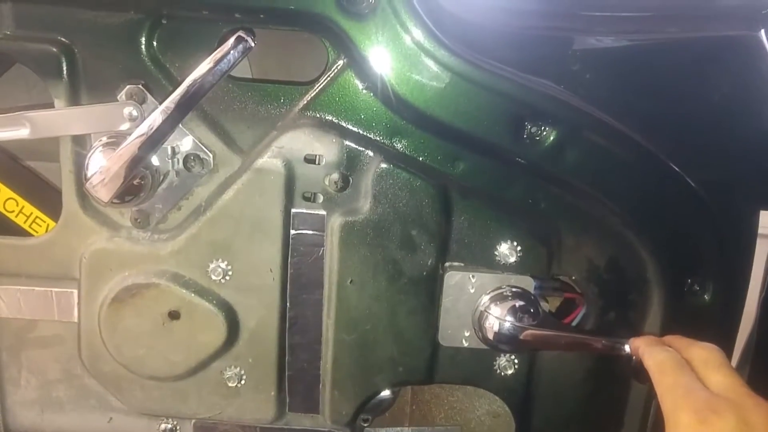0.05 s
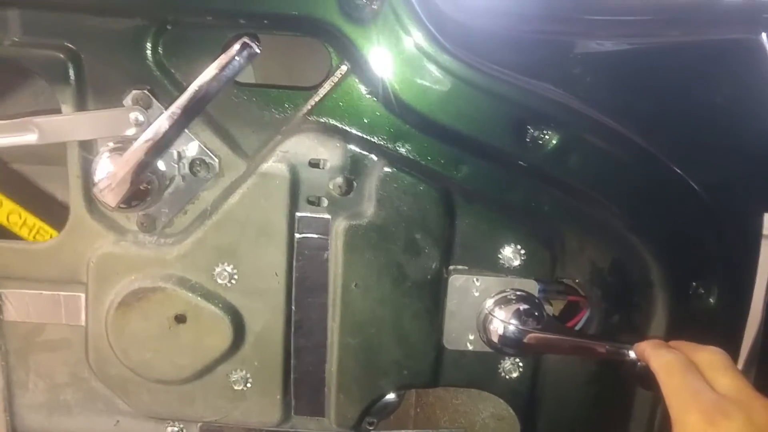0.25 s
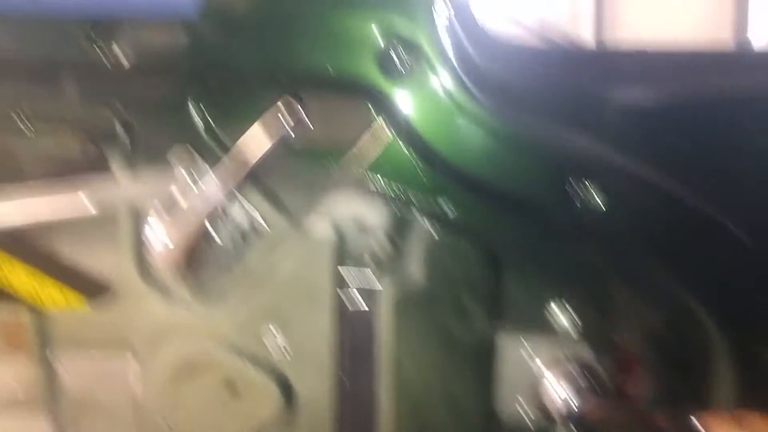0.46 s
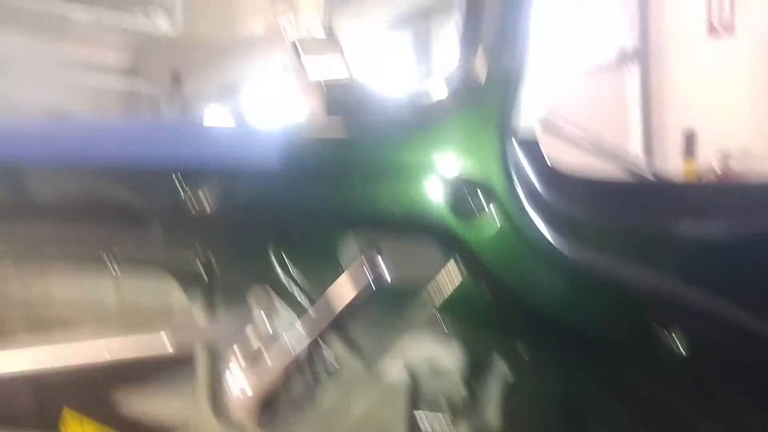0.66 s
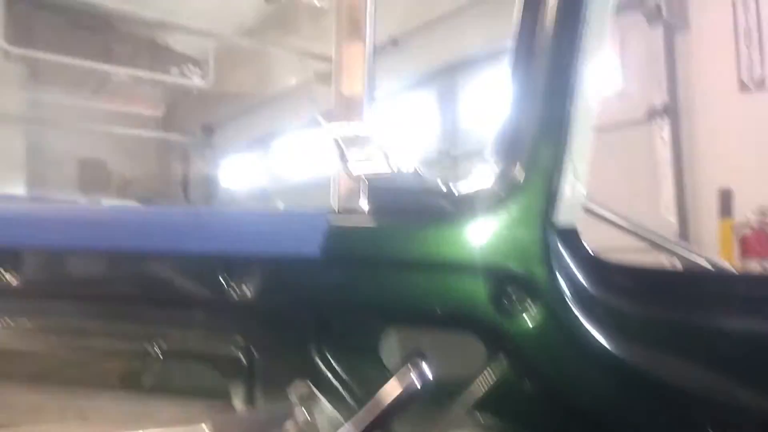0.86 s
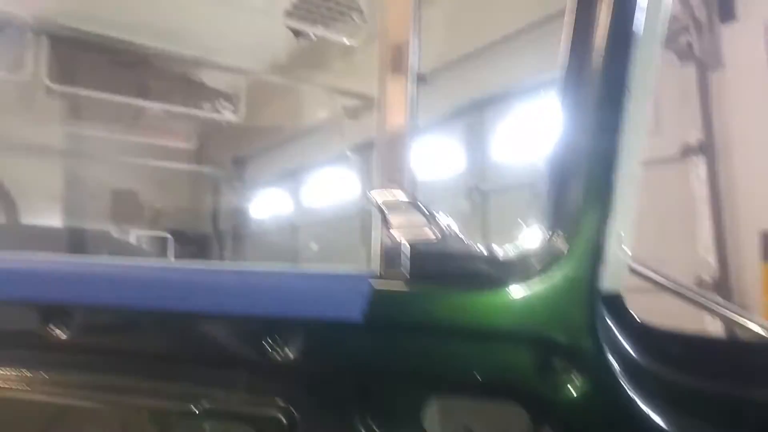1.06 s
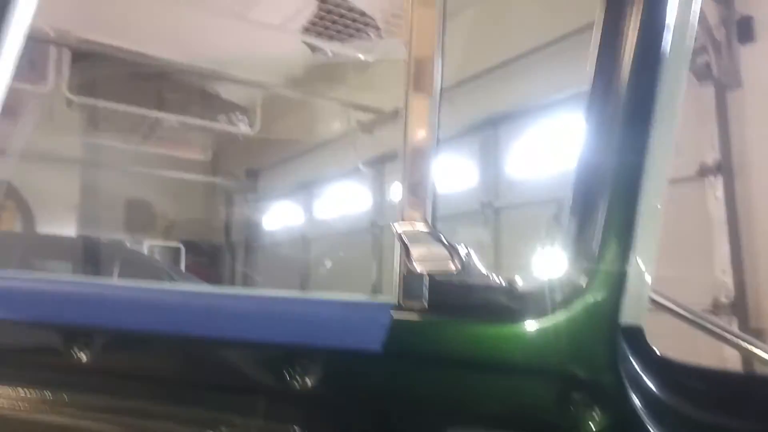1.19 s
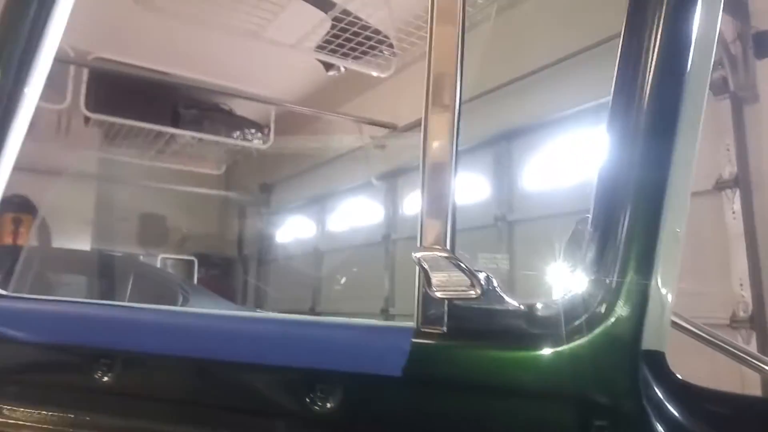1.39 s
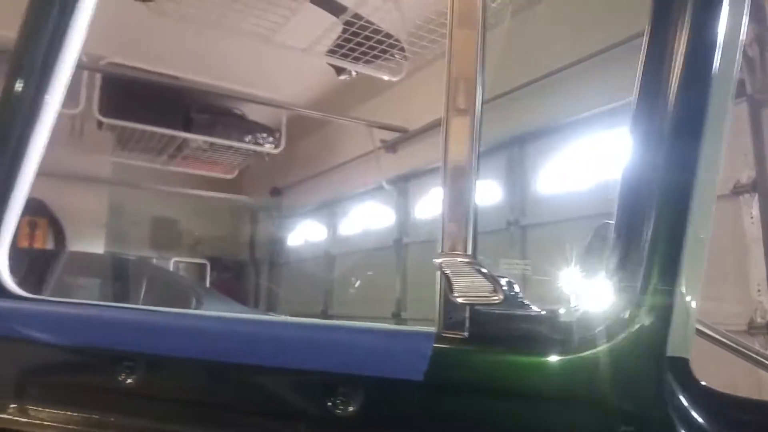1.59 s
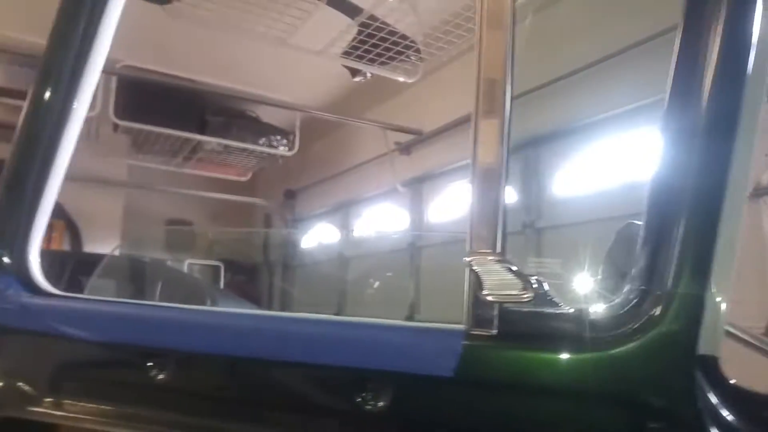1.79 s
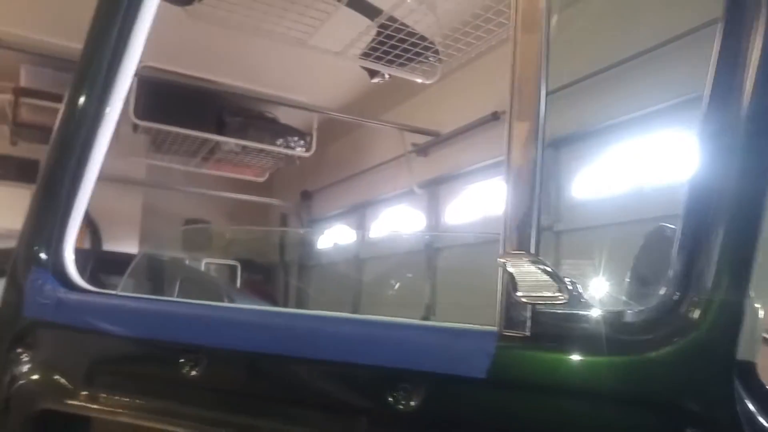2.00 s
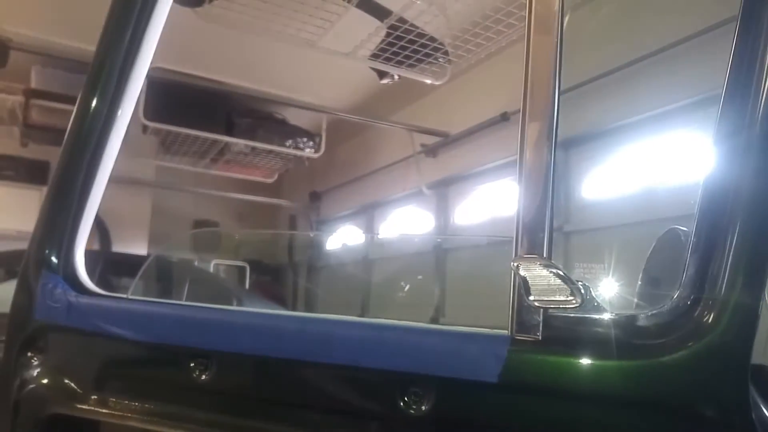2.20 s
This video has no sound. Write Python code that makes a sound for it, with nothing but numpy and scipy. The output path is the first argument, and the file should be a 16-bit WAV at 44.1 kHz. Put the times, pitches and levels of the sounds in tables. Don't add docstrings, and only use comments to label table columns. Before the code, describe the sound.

A power window motor runs inside a hollow steel vehicle door. Faint garage murmur comes first; a switch ticks near 0.2 s, then loud knocks, rattles and gritty scrapes crowd in until 0.8 s. A steady low hum with gear whine and bright brush hiss continues, with softer knocks around 1.4-1.55 s. At 1.8 s it clicks and clunks off, with tiny spring chatter and low panel ringing fading into murmur.

```python
import sys
import numpy as np
from scipy import signal
from scipy.fft import rfft, irfft
from scipy.io import wavfile
from scipy.ndimage import uniform_filter1d

SR = 44100
rng = np.random.default_rng(int(sys.argv[2]) if len(sys.argv) > 2 else 0)


def voltage_ratio(decibels):
    exponent = np.asarray(decibels, float) / 20
    return 10 ** exponent


def dump_mix(stems):
    frames = np.atleast_2d(stems).T
    limited = np.clip(frames, -1, 1)
    pcm = np.round(limited * 32767).astype(np.int16)
    wavfile.write(sys.argv[1], SR, pcm)


N = 99225
T = np.arange(N) / SR

# [t/s, turns per s]
SHAFT_SPEED = [(0.209, 96), (0.299, 110), (.41, 108.6), (.46, 107), (.59, 107), (.66, 108.3), (1.25, 108.4),
               (1.42, 109.6), (1.84, 109.7)]
WHINE_MULTIPLES = [2, 6, 8.9, 22, 25, 26, 28, 30, 34, 38, 40, 70, 80]
WHINE_LEVELS = [(-40, -54, -44, -53), (-44, -51, -41, -52.5), (-52, -45, -47.5, -54),
                (-48, -57, -49, -57.5), (-55, -65, -47, -60), (-47.5, -52, -59, -59),
                (-70, -69, -64, -52.5), (-65, -54, -50, -55.5), (-64, -66, -60, -58),
                (-70, -55.5, -53, -68), (-52, -48.5, -61.5, -50), (-47.5, -54, -50, -52),
                (-64, -65, -52, -54)]
POSE_TIMES = [.52, .7, 1.15, 1.45]
# [t/s, level/dB]
COMMUTATOR = [(.3, -50), (.44, -37), (.63, -36.5), (.7, -48.5), (1.18, -45.5), (1.44, -33.5), (1.6, -36),
              (1.83, -34)]
START_S, SPIN_UP_S, STOP_S, COAST_S = 0.23, 0.25, 1.83, 0.04
WHINE_WAVER_DB = 1.4

# [t/s, level/dB]
BOOM = [(.195, -33.5), (.222, -12.5), (.288, -21), (.312, -15.5), (.375, -25), (.432, -17.5), (.46, -25.5),
        (.544, -17.5), (.606, -26), (.7, -22), (.725, -15.5), (.78, -19.5), (1.5, -23), (1.586, -23),
        (1.62, -23.5), (1.83, -26)]
# [multiple of its pitch, level/dB]
BOOM_PARTS = [
    (1, -1),
    (2, -19.5),
]
BOOM_HZ, BOOM_WANDER_HZ = 120.06, 1.255

# [t/s, peak level/dB, brightness/dB, length/s]
KNOCKS = [(0.208, -22.5, -10.5, 0.025), (0.229, -14, -35, 0.015), (0.293, -4, -12, 0.029),
          (0.405, -15.5, -6, 0.024), (0.415, -5, -33, 0.018), (0.436, -15, -20, 0.011),
          (0.497, -9, -31, 0.013), (0.512, -10, -35, 0.01), (0.538, -20, -24, 0.012),
          (0.574, -9.5, -34, 0.0074), (0.586, -16, -26, 0.026), (0.601, -12, -31, 0.02),
          (0.626, -18, -24, 0.013), (0.649, -14, -26, 0.015), (0.689, -18, -34, 0.03),
          (0.759, -29, -30, 0.015), (0.8, -20, -26, 0.015), (1.41, -17.5, -30, 0.033),
          (1.484, -19.5, -27, 0.024), (1.546, -14, -25.5, 0.023), (1.829, -9.5, -25.5, 0.022)]
# [f/Hz, level/dB]
DOOR_MODES = [(125, -2.5), (180, -12), (230, -7.5), (345, -2), (378, -4), (610, -0.5), (707, 1),
              (810, -3.5), (955, -22), (1100, -6), (1370, -8), (1700, -8.5), (2050, -17), (2450, -17)]
# [f/Hz, level/dB]
CRACK_COLOUR = [(350, -32), (600, -0.5), (1260, -7.5), (2310, -17), (4010, -26), (8290, -20.5),
                (15000, -43)]
CONTACTS_PER_S, KNOCK_DB, CRACK_DB, CRACK_T60_S = 2500, -13.5, 11, 0.081
DOOR_T60_S, DOOR_DAMPING = 0.14, 0.6

# [t/s, level/dB, f/Hz, t60/s]
REBOUND = [(.294, -10.5, 1030, 0.046), (.299, -13, 830, 0.2), (.309, -14, 740, 0.13), (.418, -17, 373, .15),
           (.654, -14.5, 740, 0.055), (1.845, -22, 580, 0.21), (0.43, -13, 231, 0.25),
           (.594, -13, 624, 0.22), (1.833, -12, 593, 0.084), (1.834, -11.5, 827, 0.041),
           (.44, -17, 610, 0.098), (0.52, -19.5, 794, .05), (1.842, -15, 124, 0.34), (1.855, -28, 65, 0.88),
           (1.881, -25.5, 47, 1.6), (1.864, -21.5, 360, 0.21), (1.859, -21, 211.3, 0.25),
           (1.912, -27.5, 271, 0.4), (1.947, -26.5, 136.4, 0.19)]

# [t/s, level/dB]
SHAKE = [(.19, -41), (.23, -32), (.38, -26), (.45, -25.5), (.7, -27.5), (.85, -35), (1.38, -36),
         (1.45, -31), (1.62, -36), (1.81, -34.5), (1.87, -36), (2.1, -45.5), (2.25, -48)]
# [f/Hz, level/dB per Hz]
SHAKE_COLOUR = [(82, -53), (140, -9), (172, -8), (346, -15), (491, -9.5), (655, -13.5), (1100, -23),
                (1510, -32), (2500, -47), (3250, -79), (5500, -120)]
RATTLES_PER_S, RATTLE_DB, RATTLE_SPREAD_DB, RATTLE_CLUMP_DB = 900, -3, 2.5, 1.5

# [t/s, peak level/dB, f/Hz, t60/s]
SCRAPES = [(0.209, -31.5, 2230, 0.13), (.212, -37, 1760, 0.11), (.293, -29, 8300, 0.064),
           (.293, -32, 5500, .06), (.293, -23, 1490, 0.089), (.293, -22.5, 2460, .1),
           (.296, -31, 3150, .06), (.32, -32.5, 2320, 0.087), (.404, -29.5, 7200, 0.12),
           (0.404, -31.5, 4560, 0.088), (.404, -30, 2500, .06), (.408, -38, 10500, 0.051),
           (1.825, -30, 2300, .06), (1.827, -30, 1280, .06), (1.829, -35, 3600, .1), (.49, -35, 2280, .08),
           (.516, -34, 2150, .07), (.591, -32, 1920, 0.088), (0.616, -33.5, 2320, 0.099),
           (.653, -33.5, 2360, .05), (.682, -33.5, 2240, .08), (1.47, -40, 8300, 1), (1.62, -46, 8160, .8)]
SCRAPE_WIDTH = 0.17

# [t/s, peak level/dB, f/Hz]
TICKS = [
    (0.1836, -19, 8500),
    (1.81, -24.5, 8360),
    (1.8265, -26.5, 5570),
]
# [t/s, peak level/dB]
CHATTER = [
    (1.8537, -31),
    (1.874, -33),
    (1.8971, -34),
    (1.917, -33),
    (1.9304, -35.5),
]
TICK_T60_S, TICK_WIDTH, TICK_DB = 0.053, 0.087, -6.5
CHATTER_HZ, SNAP_DB, SNAP_T60_S = 12600, -6.5, 0.032

# [t/s, level/dB]
HISS = [(.18, -49), (.3, -35.5), (.5, -35.5), (1.3, -39), (1.55, -37.5), (1.82, -39), (1.87, -45),
        (2.0, -52)]
# [f/Hz, level/dB per Hz]
HISS_COLOUR = [(1060, -4), (1800, 0.5), (3170, -3.5), (3540, -5.5), (5800, -2.5), (8440, 2), (10500, -7.5),
               (13600, -7.5), (16000, -6.5)]

# [t/s, level/dB]
SHUDDER = [(0, -54), (.18, -57), (.25, -44), (.7, -28.5), (1.0, -42), (1.25, -43), (1.6, -35), (1.8, -42.5),
           (2.0, -30.5), (2.25, -50)]
SHUDDER_HZ, SHUDDER_WIDTH_HZ = 58, 18.4

# [t/s, murmur level/dB, microphone hiss level/dB]
BACKGROUND = [(0, -43, -52), (.2, -43.5, -50.5), (2.0, -40, -47.5), (2.25, -42, -47.5)]
# [f/Hz, level/dB]
MURMUR_COLOUR = [(53, -56), (90, -25), (242, -8), (292, -28), (365, -2), (411, -16.5), (758, -12),
                 (1500, -28.5), (1950, -58), (3300, -120)]
# [f/Hz, level/dB]
MIC_HISS_COLOUR = [(880, -40), (1500, -8.5), (1810, -5), (5280, -19), (7170, -4), (8400, -12), (16000, -30)]
FAN_HZ, FAN_DB = 849, -47

# [f/Hz, likeness from 0 to 1]
LIKENESS = [(200, 1), (950, 0.61), (3500, 0.25), (15000, .1)]
# [f/Hz, level/dB of left over right]
LEAN = [(400, 0), (1000, 4), (3000, 4), (8500, 3), (13000, 3)]
GARAGE_T60_S, GARAGE_DB, WALL_CUT_HZ = 0.4, -17.5, 3800

NOTCH_HZ, NOTCH_WIDTH_HZ, NOTCH_DEPTH = 490, 122.6, 0.8
PORT_SPREAD_HZ = 1240
PORT_HZ, PORT_WIDTH_HZ, PORT_DB = 7550, 690, 2.5
PORT_DIP_HZ, PORT_DIP_WIDTH_HZ, PORT_DIP_DB = 7840, 180, -7
UPPER_PORT_HZ, UPPER_PORT_DB = 7750, 1
LOW_CUT_HZ, HIGH_CUT_HZ, CEILING = 52.2, 16300, 0.93


def rms_one(x):
    return x / np.sqrt(np.mean(x ** 2) + 1e-20)


def in_time(rows, column=1):
    rows = np.array(rows)
    return np.interp(T, rows[:, 0], rows[:, column], left=-120, right=-120)


def at_hz(points, hz):
    points = np.array(points)
    return np.interp(np.log(hz), np.log(points[:, 0]), points[:, 1])


def drift(rate):
    r = np.exp(-80 * np.pi * rate / SR)
    push = rng.standard_normal(N // 40 + 2002)
    slow = signal.lfilter([1], [1, -2 * r, r * r], push)[2000:]
    return np.interp(np.arange(N) / 40, np.arange(len(slow)), rms_one(slow))


def ring(x, hz, t60):
    r = voltage_ratio(-60 / (t60 * SR))
    w = 2 * np.pi * hz / SR
    return signal.lfilter([0, np.sin(w)], [1, -2 * r * np.cos(w), r * r], x + 1e-18)


def band(x, hz, width):
    sos = signal.butter(2, [hz * (1 - width), hz * (1 + width)], "band", fs=SR, output="sos")
    return signal.sosfilt(sos, x)


def shaped(x, db, phase=0):
    return irfft(rfft(x, 2 * N) * voltage_ratio(db) * np.exp(1j * phase), 2 * N)[..., :N]


def noise(colour, patchy_db):
    hz = np.fft.rfftfreq(N, 1 / SR) + 1
    alike = np.clip(1.25 * at_hz(LIKENESS, hz) - 0.42, 0, 1)
    mid, side = rfft(rng.standard_normal((2, N))) * voltage_ratio(at_hz(colour, hz))
    lean = voltage_ratio(at_hz(LEAN, hz) / 2 * np.array([[1], [-1]]))
    pair = lean * (np.sqrt(1 + alike) * mid + np.sqrt(1 - alike) * side * [[1], [-1]])
    together = drift(8)
    octave = np.log2(hz / 40)
    out = 0
    for k in range(10):
        slice_k = irfft(pair * np.clip(1 - abs(octave - k), 0, 1), N)
        out = out + voltage_ratio(patchy_db * (1.9 * together + drift(13))) * slice_k
    return rms_one(out)


def grains(rate, spread_db):
    hits = rng.random(N) < rate / SR
    sizes = voltage_ratio(spread_db * np.minimum(rng.exponential(1, N), 4))
    return hits * sizes * rng.choice([-1, 1], N)


def bursts(rows):
    return sum(voltage_ratio(db - 60 * np.clip(T - s, 0, None) / max(t60, 0.004)) * (T >= s) for s, db, t60 in rows)


def whine():
    s, turns_per_s = np.transpose(SHAFT_SPEED)
    speed = np.interp(T, s, turns_per_s) * (1 + 0.0015 * drift(14))
    angle = 2 * np.pi * np.cumsum(speed) / SR
    spin_up = np.clip((T - START_S) / SPIN_UP_S, 0, 1)
    coast = voltage_ratio(-60 * np.clip(T - STOP_S, 0, None) / COAST_S)
    lines = 0
    for k, db in zip(WHINE_MULTIPLES, WHINE_LEVELS):
        level = np.interp(T, POSE_TIMES, db) + WHINE_WAVER_DB * drift(10 + k / 4)
        lines = lines + voltage_ratio(level) * np.sin(k * angle + k * k)
    commutator = voltage_ratio(in_time(COMMUTATOR) + 1.5 * drift(20)) * np.sin(10 * angle)
    return np.sqrt(2) * (spin_up * coast * lines + commutator)


def boom():
    phase = 2 * np.pi * np.cumsum(BOOM_HZ + BOOM_WANDER_HZ * drift(4.2)) / SR
    tones = sum(voltage_ratio(db) * np.sin(k * phase) for k, db in BOOM_PARTS)
    return np.sqrt(2) * voltage_ratio(in_time(BOOM)) * tones


def door(x):
    out = 0
    for hz, db in DOOR_MODES:
        t60 = DOOR_T60_S * (300 / hz) ** DOOR_DAMPING
        out = out + voltage_ratio(db) * ring(x * voltage_ratio(2 * drift(16.7)), hz, t60)
    return out


def knocks():
    envelope = bursts([(s, db, 3 * length) for s, db, _, length in KNOCKS])
    envelope = uniform_filter1d(envelope, size=161, origin=80)
    contacts = rms_one(grains(CONTACTS_PER_S, 3.4))
    return voltage_ratio(KNOCK_DB - 20.5) * door(contacts * envelope)


def cracks():
    rows = [(s, db + bright, CRACK_T60_S * length / 0.017) for s, db, bright, length in KNOCKS]
    return voltage_ratio(CRACK_DB) * bursts(rows) * noise(CRACK_COLOUR, patchy_db=5.5)


def rebound():
    out = 0
    for s, db, hz, t60 in REBOUND:
        click = 1.0 * (np.arange(N) == int(s * SR))
        out = out + voltage_ratio(db) * ring(uniform_filter1d(click, size=16), hz, t60)
    return out


def rattle():
    rate = RATTLES_PER_S * voltage_ratio(RATTLE_CLUMP_DB * drift(9.7))
    return voltage_ratio(in_time(SHAKE) + RATTLE_DB) * rms_one(door(grains(rate, RATTLE_SPREAD_DB)))


def shaking():
    return voltage_ratio(in_time(SHAKE) + 1.5) * noise(SHAKE_COLOUR, patchy_db=1)


def scrapes():
    grit = rms_one(np.array([grains(6000, 3), grains(6000, 3)]))
    out = 0
    for s, db, hz, t60 in SCRAPES:
        envelope = uniform_filter1d(bursts([(s, db, t60)]), size=89, origin=44)
        out = out + envelope * rms_one(band(grit, hz, SCRAPE_WIDTH))
    return voltage_ratio(-20 * np.clip(T - STOP_S, 0, None) / COAST_S) * out


def ticks():
    rows = [(*row, TICK_T60_S) for row in TICKS]
    rows += [(s, db, CHATTER_HZ, SNAP_T60_S) for s, db in CHATTER]
    rings = 0
    for s, db, hz, t60 in rows:
        tone = rms_one(band(rng.standard_normal((2, N)), hz, TICK_WIDTH))
        rings = rings + bursts([(s, db + TICK_DB, t60)]) * tone
    treble = signal.butter(4, 9000, "high", fs=SR, output="sos")
    snap = rms_one(signal.sosfilt(treble, rng.standard_normal((2, N))))
    return rings + snap * bursts([(s, db + SNAP_DB, SNAP_T60_S) for s, db, *_ in rows])


def hiss():
    return voltage_ratio(in_time(HISS)) * noise(HISS_COLOUR, patchy_db=0.58)


def shudder():
    t60 = 1.34 / SHUDDER_WIDTH_HZ
    sway = ring(rng.standard_normal(N), SHUDDER_HZ, t60)
    return voltage_ratio(in_time(SHUDDER)) * rms_one(ring(sway, SHUDDER_HZ, t60 / 2))


def garage(x):
    hz = np.fft.rfftfreq(2 * N, 1 / SR)
    out = np.zeros((2, N + 1), complex)
    for k, lag in enumerate(rng.uniform(0.015, 0.05, 16)):
        wall = voltage_ratio(-60 * lag / GARAGE_T60_S) / (1 + 1j * hz / WALL_CUT_HZ)
        loop = wall * np.exp(-2j * np.pi * hz * lag)
        out[k % 2] += loop / (1 - loop) * (-1) ** (k // 2)
    alike = at_hz(LIKENESS, hz + 1) ** 2
    return irfft(rfft(x, 2 * N) * (alike * out[0] + (1 - alike) * out), 2 * N)[:, :N]


def background():
    fan_level = voltage_ratio(FAN_DB + 44 + drift(7.9)) * np.clip(T / 2, 0, 1) ** 2
    fan = fan_level * np.sin(2 * np.pi * FAN_HZ * T)
    murmur = voltage_ratio(in_time(BACKGROUND)) * (noise(MURMUR_COLOUR, patchy_db=0) + fan)
    return murmur + voltage_ratio(in_time(BACKGROUND, column=2)) * noise(MIC_HISS_COLOUR, patchy_db=1)


def ports(x):
    hz = np.fft.rfftfreq(2 * N, 1 / SR) + 1
    sides = np.array([[0.5], [-0.5]])
    lead = np.pi / 2 * np.tanh(hz / PORT_SPREAD_HZ)
    return shaped(x, at_hz(LEAN, hz) * sides, lead * sides)


def scene():
    struck = rattle() + knocks()
    near = cracks() + ticks() + scrapes()
    direct = ports(struck + whine() + boom() + shudder() + rebound())
    echo = voltage_ratio(GARAGE_DB) * garage(struck + near[0])
    return direct + echo + shaking() + hiss() + near + background()


def low_pass(x):
    return signal.sosfilt(signal.butter(12, 16360, fs=SR, output="sos"), x)


def record(dry):
    hz = np.fft.rfftfreq(2 * N, 1 / SR)
    notch = np.exp(-((hz - NOTCH_HZ) / NOTCH_WIDTH_HZ) ** 2 * 2)
    floor_dip = 20 * np.log10(1 - NOTCH_DEPTH * notch)
    port = PORT_DB * np.exp(-((hz - PORT_HZ) / PORT_WIDTH_HZ) ** 2)
    port_dip = PORT_DIP_DB * np.exp(-((hz - PORT_DIP_HZ) / PORT_DIP_WIDTH_HZ) ** 2)
    upper_port = UPPER_PORT_DB * np.exp(-((hz - UPPER_PORT_HZ) / PORT_WIDTH_HZ) ** 2)
    x = shaped(dry, floor_dip + port + port_dip + upper_port)
    x = signal.sosfilt(signal.butter(4, LOW_CUT_HZ, "high", fs=SR, output="sos"), x)
    x = CEILING * np.tanh(x / CEILING)
    x = signal.sosfilt(signal.cheby2(12, 70, HIGH_CUT_HZ, fs=SR, output="sos"), x)
    return low_pass(x)


dry = scene()
out = record(dry)
dump_mix(out)
```